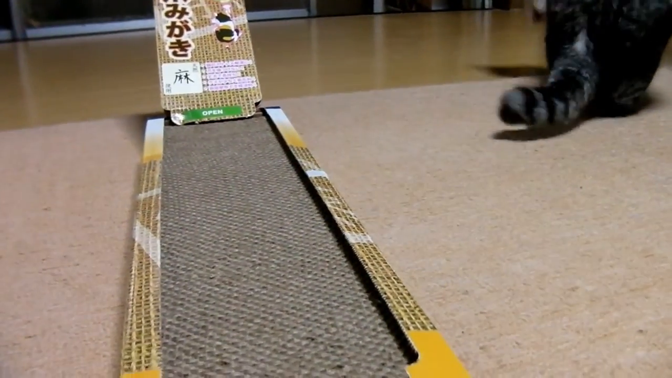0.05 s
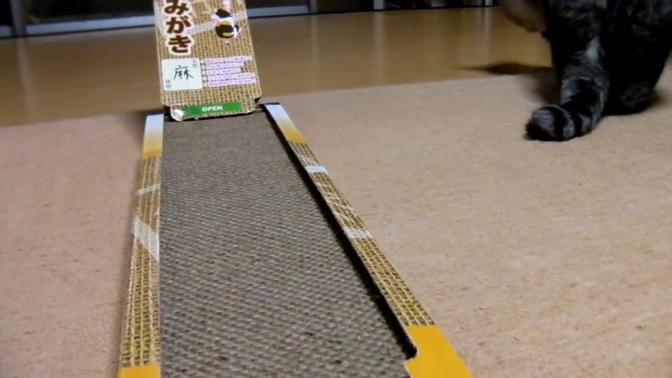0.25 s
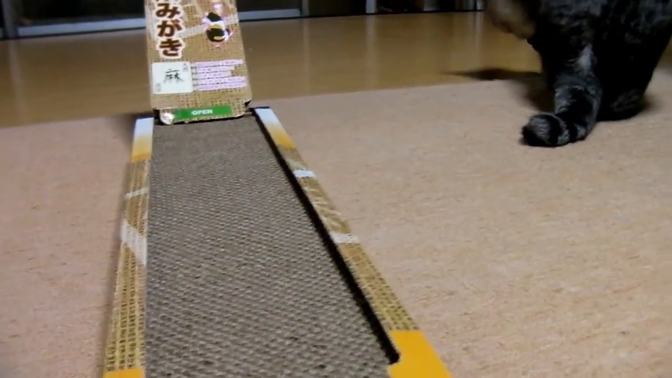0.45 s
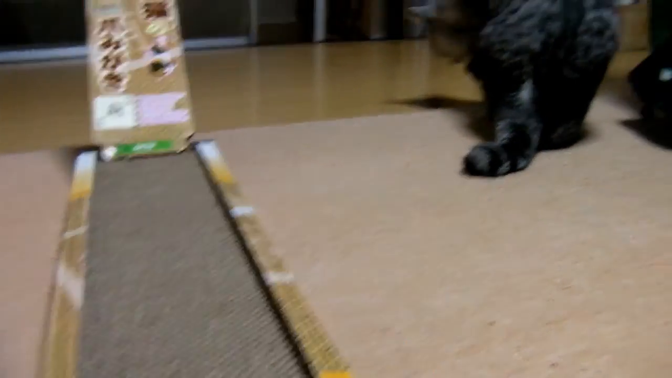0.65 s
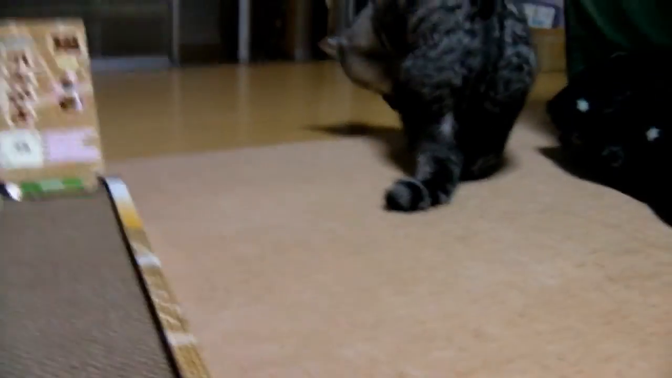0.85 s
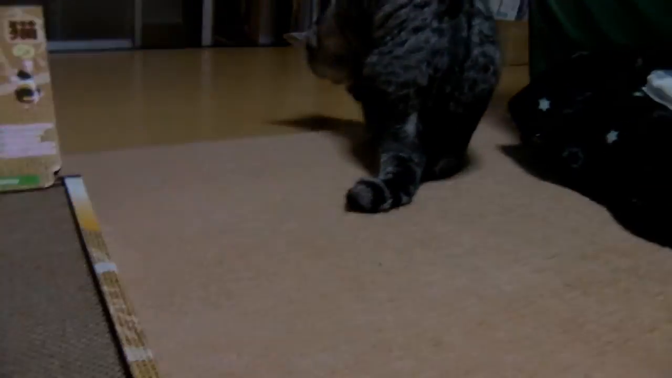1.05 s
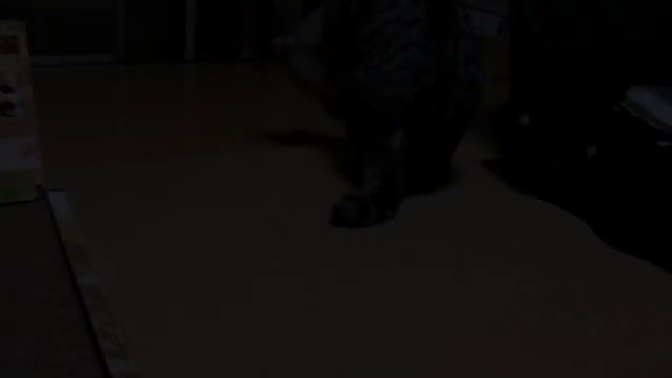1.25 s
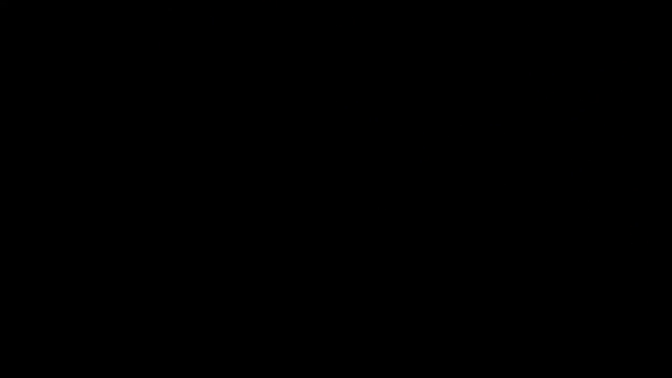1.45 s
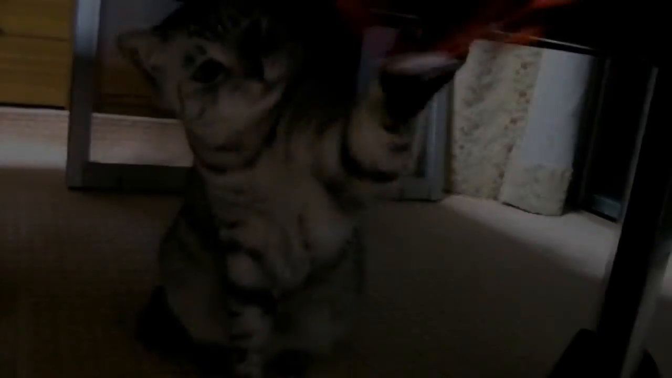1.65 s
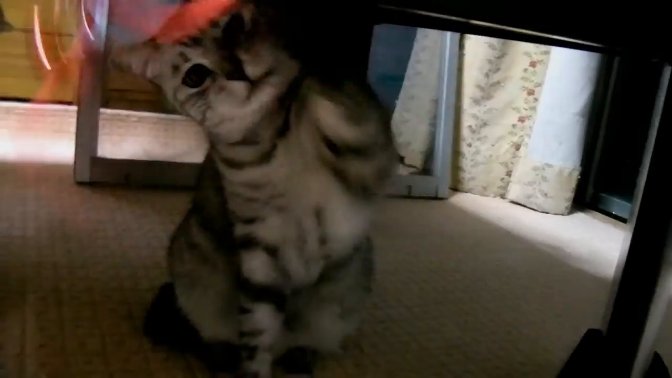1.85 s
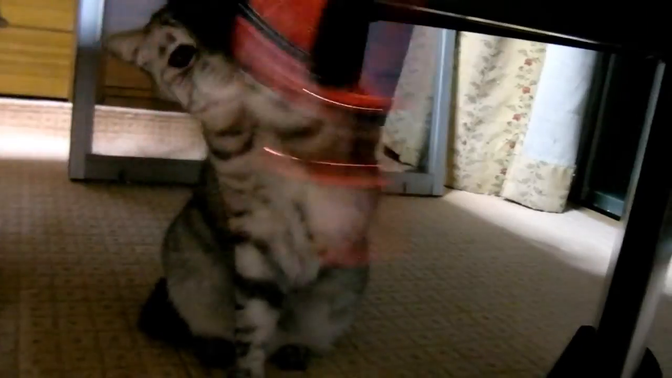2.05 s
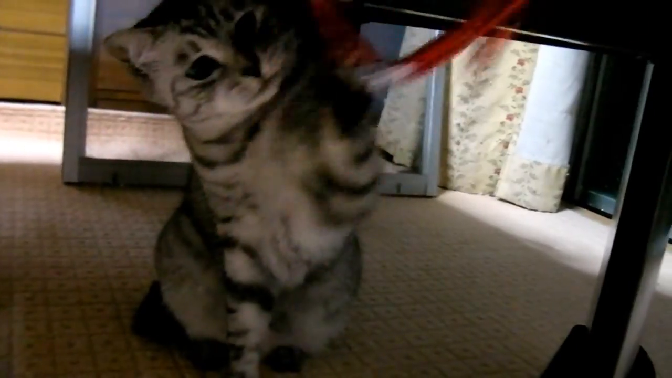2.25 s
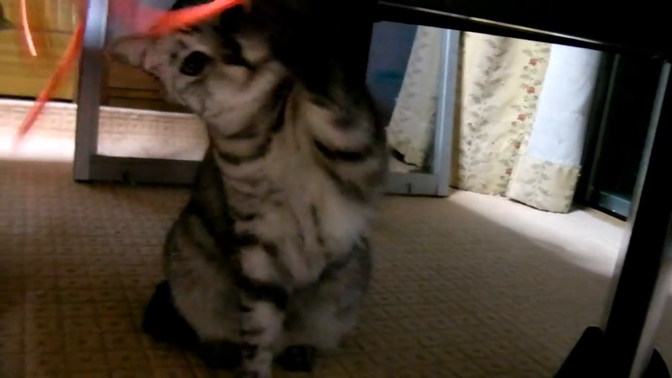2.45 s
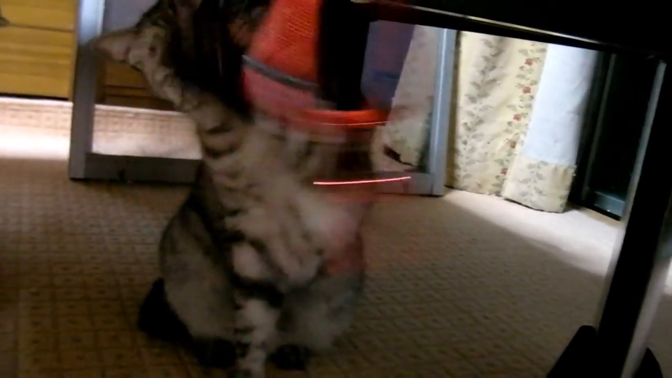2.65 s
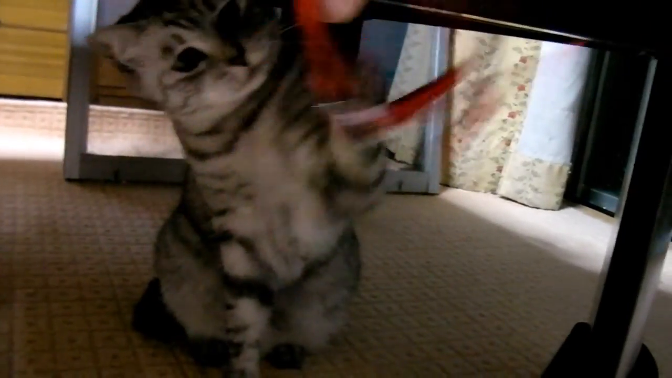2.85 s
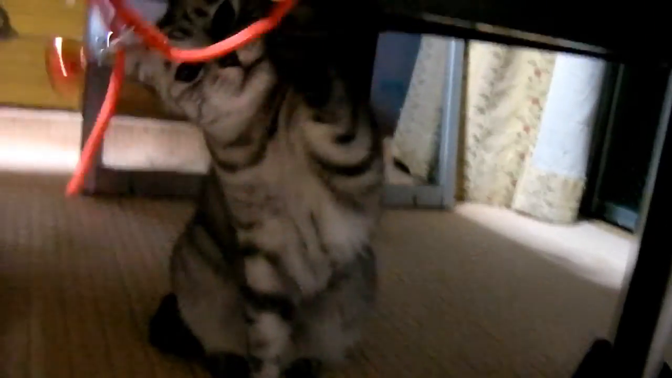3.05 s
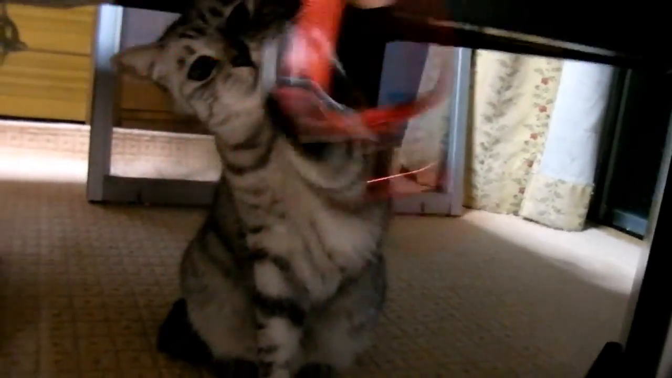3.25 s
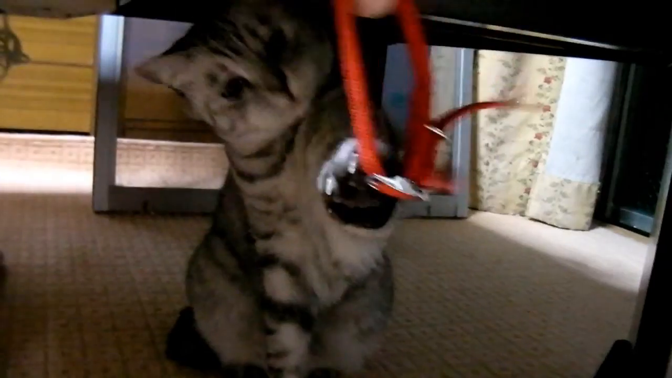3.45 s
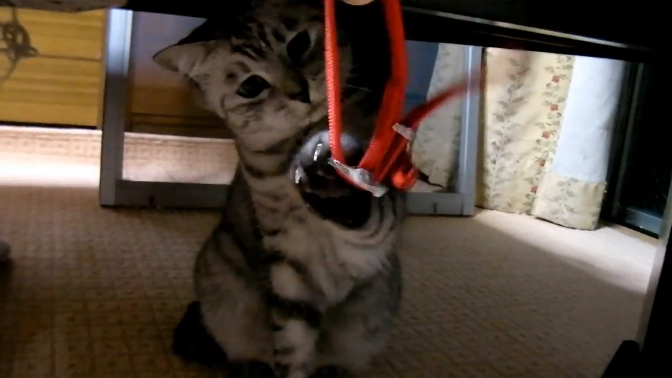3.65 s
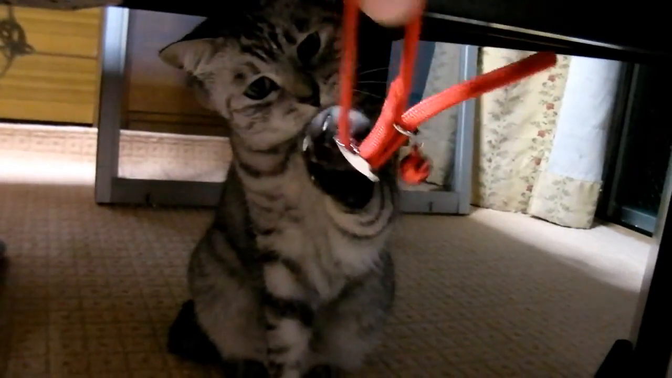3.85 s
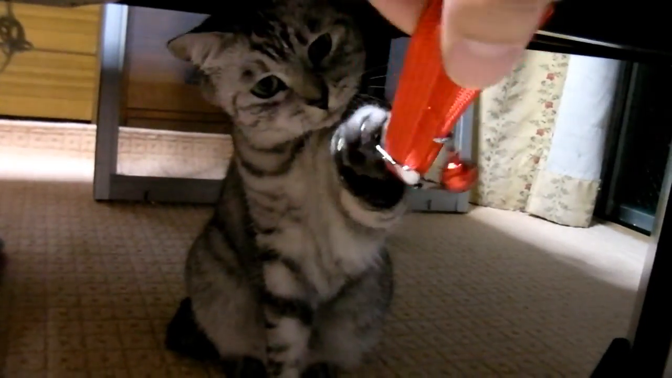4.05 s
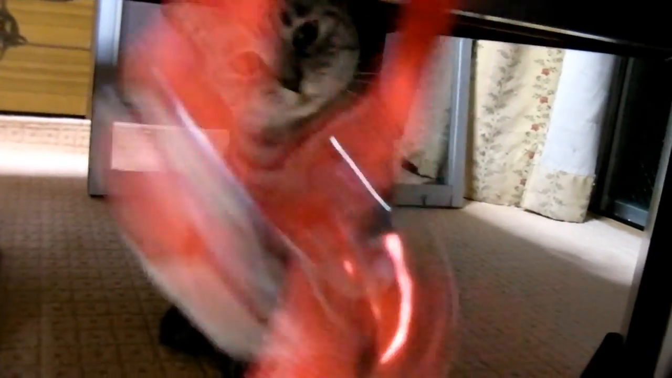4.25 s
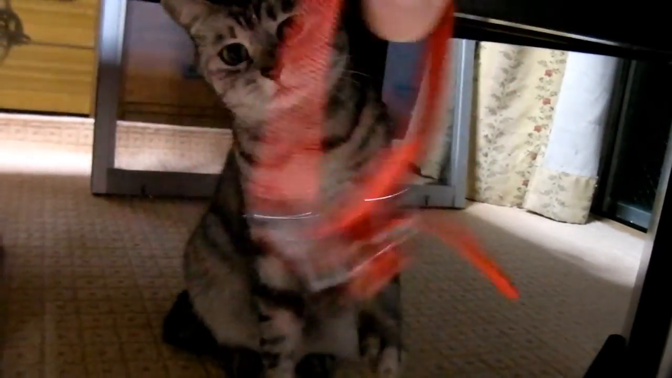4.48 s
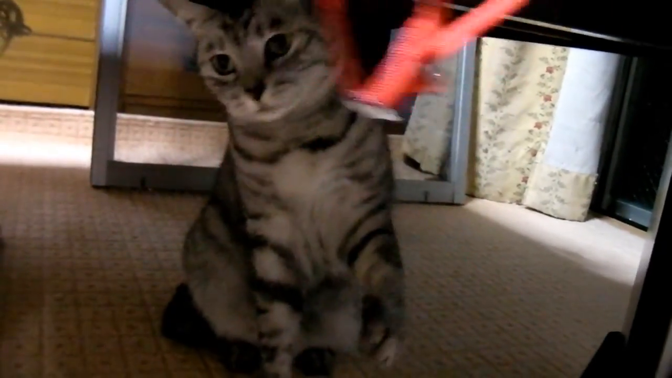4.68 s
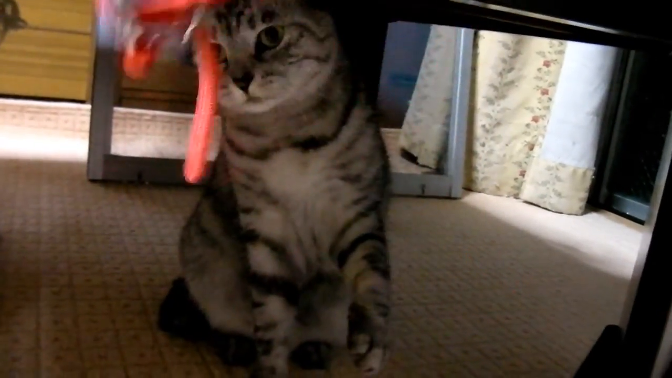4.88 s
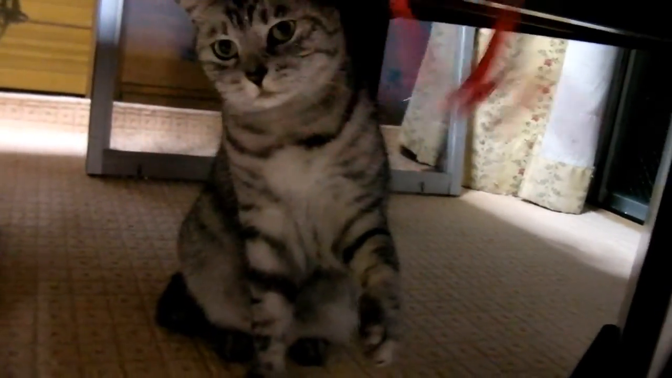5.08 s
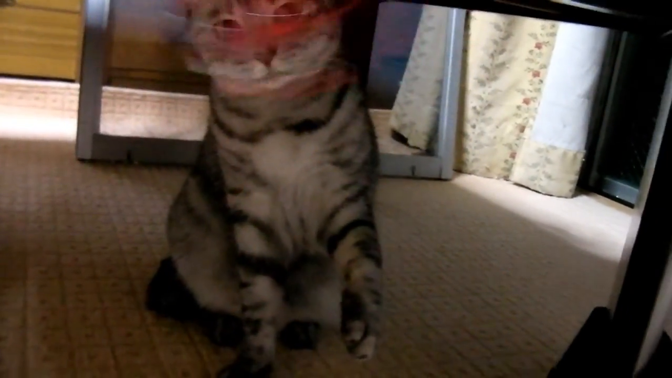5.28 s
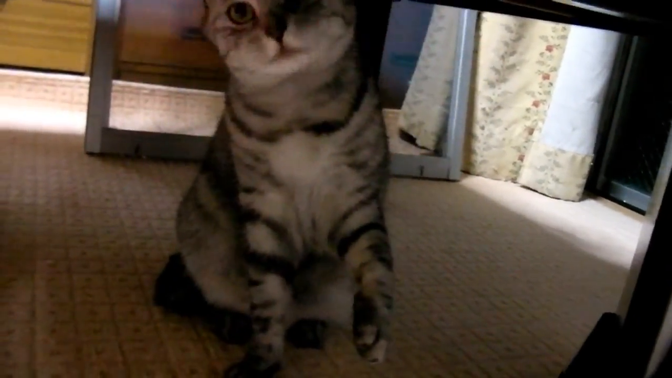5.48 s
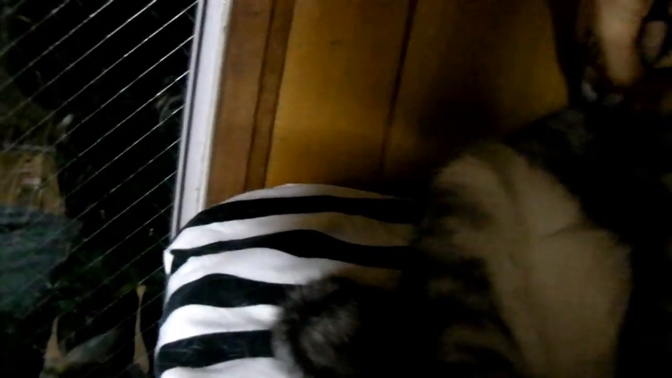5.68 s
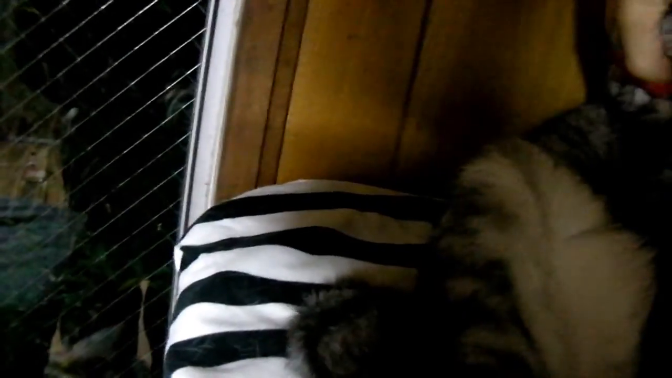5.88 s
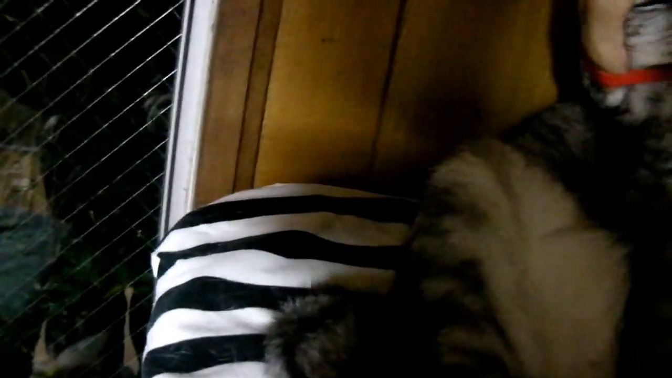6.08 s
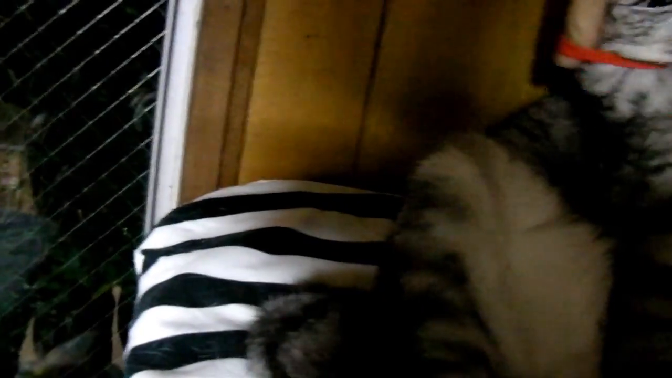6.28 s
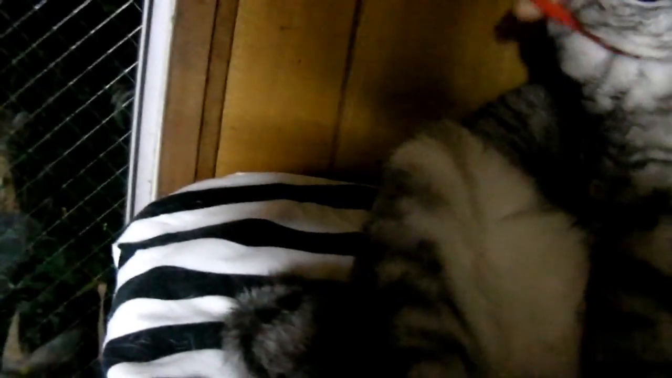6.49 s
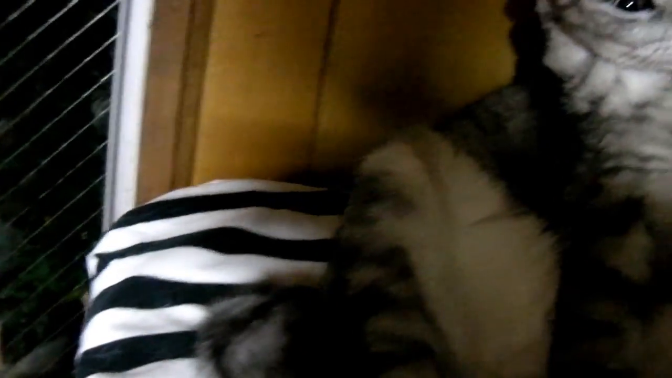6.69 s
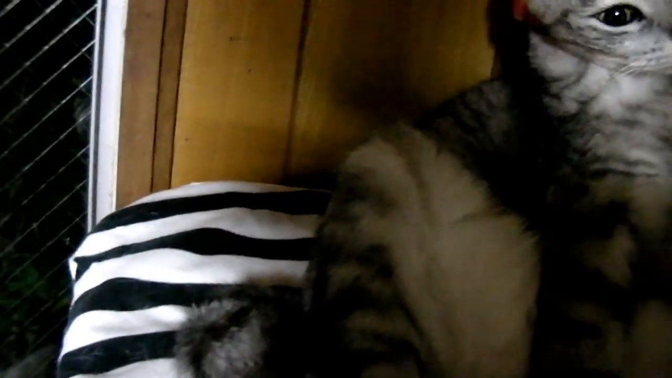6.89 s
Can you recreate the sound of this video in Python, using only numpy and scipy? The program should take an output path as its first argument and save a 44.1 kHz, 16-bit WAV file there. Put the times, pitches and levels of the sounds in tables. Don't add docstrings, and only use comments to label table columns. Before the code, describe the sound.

Hiss and lumpy handling rumble open with a few faint thumps. A small, high-pitched collar bell then jingles in quick separate shakes, with light tinkles between. The fullest burst comes when the strap is pulled free, snapping and clinking hard. One last bright jingle lands with a wooden tap, then rumble and soft bumps remain. Close handheld stereo microphone in a quiet room.

```python
import sys
import numpy as np
from scipy import signal
from scipy.fft import rfft, irfft, next_fast_len
from scipy.io import wavfile
from scipy.ndimage import uniform_filter1d

SR = 44100
rng = np.random.default_rng(int(sys.argv[2]) if len(sys.argv) > 2 else 0)


def to_wav(s):
    ch = np.atleast_2d(s).T
    pcm = np.round(np.clip(ch, -1, 1) * 32767)
    wavfile.write(sys.argv[1], SR, pcm.astype(np.int16))


def invert_db(level):
    return 10 ** (np.asarray(level, dtype=float) / 20)


N = 305454

# f/Hz, level/dB per Hz
RUMBLE_SPECTRUM = [(20, -24), (60, -5), (118, -2), (260, -5), (450, -11), (700, -48.5)]
HISS_SPECTRUM = [(150, -27.5), (400, 1), (2000, -2), (3900, -3.5), (4600, -7), (7000, -12.5), (8500, -13.5),
                 (15500, -18.5)]
# f/Hz, likeness/1
LIKENESS = [(50, 0.51), (150, 0.536), (1000, 0.1233), (4000, 0.033), (12000, 0.21)]
# t/s, level/dB
FLOOR_COURSE = [(0, -1), (.42, 0.5), (.69, 0.5), (1.0, 6), (1.41, 3.5), (2.1, -2), (3.26, -0.5), (4.1, -0.5),
                (4.6, -9), (5.1, -0.5), (5.62, -2), (5.68, 7.5), (5.94, 4.5), (6.4, -2.5), (6.73, 0), (6.93, 1.5)]
# from/s, to/s
DROPOUTS = [
    (4.9892, 4.9932),
    (5.0308, 5.036),
]
# t/s, peak/dB
THUMPS = [(0.152, -53), (0.516, -50.5), (4.315, -55.5), (4.412, -43.5), (5.768, -49), (5.914, -41),
          (6.289, -60.5), (6.531, -44.5), (6.658, -44.5), (6.88, -46.5)]
# t/s, peak/dB, body f/Hz, time for the body to fall 80 dB/s
KNOCKS = [(0.154, -52, 1550, 0.057), (1.078, -45.5, 975, 0.184), (1.371, -42.5, 1900, 0.066),
          (1.798, -18.5, 3790, 0.033), (2.1143, -21.5, 3750, 0.133), (2.135, -29.5, 2800, 0.054),
          (2.772, -33, 3940, 0.23), (2.8, -32.5, 2630, 0.08), (3.613, -30, 3550, 0.051),
          (4.278, -27, 2708, 0.018), (5.5989, -22.5, 2300, 0.042), (5.912, -35.5, 775, 0.1165),
          (6.643, -34.5, 768, 0.076), (6.728, -33.5, 514, 0.056), (6.863, -42, 782, 0.082)]
# t/s, peak/dB, body f/Hz, time for the body to fall 80 dB/s
MORE_KNOCKS = [(1.801, -39, 1000, 0.068), (2.1165, -39.5, 2300, 0.057), (2.139, -42, 1505, 0.105),
               (2.15, -45, 5230, 0.068), (2.7965, -34.5, 871, 0.118), (3.4415, -43.5, 6200, 0.5),
               (3.616, -48, 5570, 0.165), (4.284, -40, 5284, 0.3), (4.3215, -43.5, 5831, 0.173),
               (4.3627, -25.5, 5610, 0.1533), (4.4145, -30, 900, 0.064), (4.4165, -41, 2217, 0.089),
               (4.4305, -26, 5576, 0.1247), (5.604, -29.5, 1960, 0.149), (5.925, -42.5, 601.5, 0.273),
               (6.655, -43, 696, 0.154)]
# t/s, peak/dB
SNAPS = [(1.6422, -58.5), (2.781, -30), (3.443, -48), (3.4688, -34.5), (4.283, -36.5), (4.2974, -32.5),
         (4.3401, -32), (4.358, -27), (4.4149, -16.5), (5.6025, -27.5), (6.0049, -48.5), (6.0726, -41.5)]
# f/Hz, level/dB, t60/s
BOARD_MODES = [(880, 7, 0.0332), (1087, -2.5, 0.092), (3217, 8, 0.0114), (1661.5, -4, 0.118),
               (2133, 4, 0.018), (2698, 1.5, 0.07), (1900, 8, 0.0174), (3840, 5.5, 0.029),
               (1293, -1, 0.049)]
# t/s, left minus right/dB
SWING = [(1.5, 2), (2.2, 1.5), (2.9, 2), (3.55, -2.5), (4.2, -2), (4.43, -3.5), (4.65, -2.5), (5.0, 3),
         (5.7, 2)]
# t/s, main level/dB, t60/s, twin level/dB
SHAKE_BLOWS = [(1.624, -49.5, 0.41, -51), (1.6295, -39, 0.074, -37.5), (1.6423, -25, 0.45, -34.5),
               (1.6463, -48, 0.44, -49), (1.6617, -35, 0.033, -40.5), (1.6662, -33.5, 0.021, -42),
               (1.6712, -28.5, 0.42, -43.5), (1.6757, -22, 0.0161, -38.5), (1.6827, -40, 0.462, -49.5),
               (2.1127, -36.5, 0.462, -45), (2.1157, -23.5, 0.033, -39), (2.1441, -27, 0.042, -32.5),
               (2.1471, -24, 0.026, -25.5), (2.1531, -10, 0.0242, -24), (2.1565, -21, 0.04, -25),
               (2.1655, -23.5, 0.021, -28), (2.1691, -39.5, 0.56, -29), (2.195, -40.5, 0.462, -42.5),
               (2.205, -27, 0.462, -30.5), (2.208, -7.5, 0.36, -20.5), (2.2115, -15, 0.017, -18),
               (2.2145, -15.5, 0.025, -17), (2.2175, -15.5, 0.41, -23), (2.2215, -12, 0.031, -24.5),
               (2.2259, -39.5, 0.034, -31.5), (2.2359, -40, 0.46, -45), (2.2469, -30.5, 0.48, -41),
               (2.2499, -20.5, 0.445, -38), (2.2644, -18, 0.53, -37.5), (2.2683, -18, 0.023, -37),
               (2.7042, -37, 0.82, -36.5), (2.7059, -18.5, 0.116, -27), (2.7108, -16, 0.0133, -26),
               (2.7168, -30, 0.37, -38), (2.7288, -40, 0.49, -42), (2.782, -20, 0.38, -28.5),
               (2.7877, -11.5, 0.63, -16), (2.7941, -4.5, 0.0107, -19), (2.8001, -7.5, 0.049, -20),
               (2.8031, -23, 0.58, -25), (2.8101, -2, 0.0093, -14.5), (2.8131, -11.5, 0.55, -18.5),
               (2.8166, -30.5, 0.049, -20.5), (2.8201, -20.5, 0.58, -23), (2.8291, -34, 0.13, -38.5),
               (2.8485, -33.5, 0.12, -43.5), (2.8725, -43, 0.4, -48)]
PULLED_BLOWS = [(3.5452, -27.5, 0.033, -30.5), (3.5478, -23, 0.148, -36), (3.5609, -24, 0.058, -16.5),
                (3.5669, -15, 0.12, -42.5), (3.6068, -9, 0.098, -25.5), (3.6153, -8.5, 0.0168, -24),
                (3.6208, -16, 0.55, -28.5), (3.6238, -19.5, 0.55, -38), (3.6397, -21.5, 0.47, -30),
                (3.6437, -15.5, 0.062, -27.5), (3.6512, -12.5, 0.13, -30.5), (3.6622, -10.5, 0.077, -32.5),
                (3.6746, -36, 0.462, -38.5), (3.6806, -26, 0.48, -51), (3.6961, -31.0, 0.05, -40),
                (3.7066, -30.5, 0.063, -42.5), (3.7161, -28, 0.134, -37.5), (3.748, -37, 0.47, -37.5),
                (3.759, -16.5, 0.0328, -32), (3.7804, -49.5, 0.0474, -54), (4.3247, -30.5, 0.0298, -15),
                (4.3396, -33.5, 0.1366, -30.5), (4.3501, -49, 0.404, -45), (4.3576, -29.5, 0.45, -27),
                (4.3626, -14, 0.53, -13.5), (4.3676, -12.5, 0.048, -12.5), (4.3721, -10.5, 0.0198, -19.5),
                (4.3766, -11, 0.12, -22), (4.383, -32, 0.16, -31), (4.3895, -22.5, 0.0563, -31.5),
                (4.3985, -23.5, 0.462, -34.5), (4.406, -19.5, 0.494, -22.5), (4.411, -17.5, 0.49, -16.5),
                (4.4142, 9.5, 0.13, -22), (4.4297, -4.5, 0.01944, -13), (4.4364, -10.5, 0.424, -13.5),
                (4.4424, -17.5, 0.066, -29), (4.4454, -8.5, 0.426, -17.5), (4.4564, -6.5, 0.034, -20.5),
                (4.4644, -25, 0.1033, -35.5), (4.4753, -21, 0.45, -29.5), (4.4793, -17, 0.025, -27),
                (4.4878, -29, 0.058, -45.5)]
SWING_BLOWS = [(4.5093, -6.5, 0.4564, -19), (4.5132, -3, 0.17, -20.0), (4.5232, -6, 0.042, -26),
               (4.5292, -18, 0.15, -27), (4.5546, -34, 0.08, -30.5), (4.5771, -35.5, 0.462, -44),
               (4.5866, -30, 0.462, -33.5), (4.5926, -10, 0.084, -23), (4.6165, -11, 0.029, -18.5),
               (4.6265, -32, 0.462, -32), (4.6295, -10, 0.044, -19), (4.6474, -20, 0.62, -16.5),
               (4.6514, -9.5, 0.0235, -23.5), (4.6664, -32, 0.51, -34), (4.6739, -12, 0.015, -14),
               (4.6784, -20, 0.6, -36.5), (4.6958, -29, 0.074, -35), (4.7008, -16, 0.58, -28),
               (4.7043, -13, 0.045, -30.5), (4.7138, -17.5, 0.67, -27.5), (4.7168, -12.5, 0.037, -25),
               (4.7263, -20.5, 0.0678, -33), (4.7327, -13, 0.173, -30.5), (4.7417, -26, 0.041, -42.5),
               (4.7472, -38.5, 0.1655, -53), (4.7717, -36.5, 0.09, -57), (4.984, -40, 0.462, -39.5),
               (4.9857, -11, 0.41, -23.5), (4.9887, -38.5, 0.014, -37.5), (4.9937, -17.5, 0.462, -25),
               (4.9966, -32, 0.00932, -37), (5.0006, -57.5, 0.462, -59), (5.0241, -26, 0.462, -42.5),
               (5.0286, -11.5, 0.1113, -15), (5.0316, -41, 0.462, -34), (5.0366, -7.5, 0.0826, -22),
               (5.0475, -13.5, 0.074, -29), (5.0645, -17, 0.032, -31), (5.0755, -16, 0.0415, -32),
               (5.5617, 1.5, 0.047, -20), (5.566, -7, 0.169, -27), (5.5813, -23.5, 0.68, -23.5),
               (5.5933, -20, 0.63, -37.5), (5.5988, -12.5, 0.02588, -24), (5.6048, -20.5, 0.5, -29),
               (5.6107, -16.5, 0.0348, -24), (5.6212, -31, 0.45, -44), (5.6302, -25, 0.0207, -33),
               (5.6392, -39, 0.18, -41.5)]
# t/s, main level/dB, t60/s
LIGHT_TOUCHES = [(1.205, -48, 0.1), (1.5384, -36.5, 0.074), (1.811, -37.5, 0.12), (1.8182, -36, 0.039),
                 (1.88, -38, 0.0186), (1.943, -42.5, 0.0386), (2.2818, -38.5, 0.134), (2.369, -38.5, 0.055),
                 (2.4413, -34.5, 0.094), (2.4821, -39.5, 0.0127), (2.581, -38, 0.0143), (2.7517, -42, 0.63),
                 (3.003, -31.5, 0.0347), (3.451, -33.5, 0.0339), (3.522, -42, 0.13), (4.2857, -27, 0.0139),
                 (5.0869, -33, 0.092), (5.1262, -48.5, 0.241), (5.295, -36.5, 0.036), (5.491, -44.5, .15),
                 (5.782, -43, 0.027), (6.0163, -46.5, .2)]
# t/s, main and twin level/dB
GRAZES = [(1.92, -45.5), (2.4023, -44.5), (2.6064, -46), (3.3767, -48), (3.3952, -45.5), (3.487, -36.5),
          (3.5094, -43), (4.2996, -38.5), (4.3172, -29.5), (4.967, -38), (5.3289, -54), (5.3723, -45),
          (5.3926, -48), (5.478, -36), (5.506, -40.5)]
CAUGHT = [1.549, 1.691, 2.308, 2.4494, 2.888, 3.7945, 4.7877, 5.106, 5.168, 5.6594, 6.06]
# t/s, length/s, main level/dB, twin level/dB
ROLLS = [
    (1.576, 0.02562, -44.5, -60.5),
    (2.413, 0.00641, -38, -68),
    (2.9685, 0.00553, -34, -46.5),
    (3.4195, 0.006674, -44, -40.5),
    (3.4701, 0.0029, -31.5, -33.5),
    (5.464, 0.00254, -32.5, -50.5),
    (5.5205, 0.01035, -39.5, -44.5),
]
# from/s, to/s
FLIGHTS = [
    (2.155, 2.194),
    (3.5665, 3.604),
    (3.6804, 3.696),
    (4.4135, 4.429),
    (4.523, 4.577),
    (5.5615, 5.581),
]
# t/s, high mode level/dB, top mode level/dB, t60/s
CROWN_TOUCHES = [(1.6612, -51.5, -52.5, 0.13), (2.1508, -37.5, -30, 0.136), (2.209, -25, -25.5, 0.054),
                 (2.2493, -43.5, -45, 0.118), (2.7096, -42, -49.5, 0.287), (2.7873, -29, -50.5, 0.207),
                 (2.7986, -30.5, -25.5, 0.103), (2.8096, -27, -27, 0.055), (3.4222, -54.5, -57, 0.043),
                 (3.5654, -49, -45, 0.335), (3.6078, -35, -39, 0.18), (3.6146, -31, -35, 0.086),
                 (3.643, -31.5, -53.5, 0.176), (3.6626, -38, -45.5, 0.244), (3.7156, -60.5, -49, 0.31),
                 (4.3656, -49, -30.5, 0.181), (4.4082, -19.5, -45.5, 0.0935), (4.4308, -32, -24.5, 0.1006),
                 (4.447, -36.5, -40.5, 0.11), (4.5111, -41, -24, 0.36), (4.5267, -34.5, -24, 0.17),
                 (4.564, -46.5, -53, 0.278), (4.594, -27, -35.5, 0.077), (4.604, -46, -25.5, 0.088),
                 (4.6503, -45, -30.5, 0.106), (4.6734, -43, -29, .12), (4.701, -43, -35, 0.15),
                 (4.746, -61.5, -61.5, .1), (4.9856, -55, -37, 0.079), (5.0352, -44, -30, 0.164),
                 (5.049, -31.5, -40, 0.0914), (5.561, -34.5, -32.5, 0.226)]
# t/s, peak/dB
SLOT_STRIKES = [
    (4.985, -37),
    (4.994, -46.5),
    (5.028, -32),
    (5.036, -29),
    (5.562, -20.5),
]
# f/Hz, level/dB, t60/s
SLOT_MODES = [(8540, -10.5, 0.045), (13200, 0.5, 0.032)]
# t/s, peak/dB, f/Hz
LIP_HITS = [(1.7978, -40.5, 5750), (2.1145, -36.5, 5510), (2.1456, -33, 5200.0), (2.164, -32.5, 4980.0),
            (2.2071, -27.5, 5010), (2.213, -30, 4800), (2.2178, -33, 5070.0), (2.7073, -34, 5300),
            (2.7135, -38, 5050), (2.781, -29.5, 5340), (2.7927, -20, 5170), (2.8001, -20, 5160.0),
            (2.8088, -24, 5135), (2.8156, -23.5, 4988), (2.8246, -32.5, 5080.0), (3.4706, -35, 5080),
            (3.5454, -31.5, 5070.0), (3.5656, -22.5, 5100), (3.606, -25, 5110.0), (3.6137, -25, 5190),
            (3.6424, -32.0, 5126), (3.6499, -32.5, 5070), (3.6601, -33.5, 5200.0), (3.6706, -35.5, 5160.0),
            (3.7579, -41, 5180), (4.2834, -36, 5530), (4.326, -25, 5113), (4.3583, -28, 5070.0),
            (4.368, -10, 5325), (4.3815, -21.5, 5270), (4.3981, -28, 5300.0), (4.4085, -25, 5070.0),
            (4.4141, -7, 5943), (4.4249, -14.5, 5040), (4.4311, -16.5, 5420), (4.4373, -27.0, 5031),
            (4.4452, -19.5, 5120.0), (4.5084, -28, 5080), (4.5217, -26, 5078), (4.5914, -20, 5134),
            (4.6029, -11.5, 5123), (4.6325, -20, 5070.0), (4.65, -28.5, 5090.0), (4.6728, -23.5, 5130.0),
            (4.7007, -27.5, 4997), (4.9879, -31.5, 5150), (5.0306, -30.0, 5186), (5.0356, -25, 5110),
            (5.5613, -17.5, 5176), (5.5802, -24.5, 5050), (5.5873, -35, 5015), (5.5973, -31.5, 5440),
            (5.6059, -22, 5150), (5.6141, -35, 5035)]

MAIN_HZ, TWIN_HZ, HIGH_HZ, TOP_HZ = 4429, 4880, 10610, 11752
FREE_T60_S = 0.23


def rms_one(x):
    return x / np.sqrt(np.mean(x ** 2) + 1e-20)


def in_time(rows):
    t_s, value = np.transpose(rows)
    return np.interp(np.arange(N) / SR, t_s, value)


def at_hz(points, hz):
    point_hz, value = np.transpose(points)
    return np.interp(np.log(hz), np.log(point_hz), value)


def band(x, low_hz, high_hz):
    sos = signal.butter(2, [low_hz, min(high_hz, .45 * SR)], "band", fs=SR, output="sos")
    return signal.sosfilt(sos, x + 1e-18)


def drift(rate_hz):
    return rms_one(band(rng.standard_normal(N + SR), rate_hz / 4, rate_hz)[SR:])


def clicks_at(t_s, height):
    out = np.full(N, 1e-18)
    out[(np.asarray(t_s) * SR).astype(int)] = height
    return out


def burst(clicks, t60_s, channels=1):
    envelope = signal.lfilter([1], [1, -invert_db(-60 / (t60_s * SR))], clicks)
    return envelope * rng.standard_normal((channels, N))


def ring(clicks, hz, t60_s):
    r, w = invert_db(-60 / (t60_s * SR)), 2 * np.pi * hz / SR
    return signal.lfilter([0, np.sin(w)], [1, -2 * r * np.cos(w), r * r], clicks + 1e-18)


def coloured(spectrum):
    size = next_fast_len(N)
    hz = np.maximum(np.arange(size // 2 + 1) * SR / size, 1)
    mid, side = rfft(rng.standard_normal((2, size))) * invert_db(at_hz(spectrum, hz))
    alike = np.clip(at_hz(LIKENESS, hz), 0, 1)
    pair = np.sqrt(1 + alike) * mid + np.sqrt(1 - alike) * side * [[1], [-1]]
    return rms_one(irfft(pair, size)[:, :N])


def floor(loud):
    course_db = in_time(FLOOR_COURSE)
    fade_db = -5 * np.exp(-((np.arange(N) / SR - 1.515) / 0.42) ** 2)
    rumble_db = -60.5 + course_db + fade_db
    hiss_db = -55.5 + 0.2 * course_db + fade_db
    hiss = coloured(HISS_SPECTRUM)
    notch_hz, width_hz = 7843, 640
    hiss = hiss - signal.lfilter(*signal.iirpeak(notch_hz, notch_hz / width_hz, SR), hiss)
    level_db = 20 * np.log10(uniform_filter1d(np.abs(loud), SR // 50) + 1e-9)
    recovery_db = 150 * np.arange(N) / SR
    over_db = np.maximum.accumulate(np.maximum(level_db + 45, 0) + recovery_db) - recovery_db
    lumps_db = 1.4 * drift(4.55) + 3 * drift(25)
    rumble = invert_db(rumble_db + lumps_db + 2.0 - 0.22 * over_db) * coloured(RUMBLE_SPECTRUM)
    return rumble + invert_db(hiss_db + 5 + 0.89 * drift(22.0) + 0.12 * lumps_db - 0.11 * over_db) * hiss


def room(x, t60_s):
    t = np.arange(SR // 3) / SR
    echoes = rng.standard_normal((2, len(t))) * invert_db(-60 * t / t60_s) * (t > .004)
    return signal.fftconvolve(x[None], echoes / np.sqrt(np.sum(echoes[0] ** 2)), axes=1)[:, :N]


def thumps():
    t_s, peak_db = np.transpose(THUMPS)
    return band(burst(clicks_at(t_s, invert_db(peak_db + 17.5)), t60_s=0.1)[0], 58.867, 420)


def board_tap():
    tap_s, tap_db = 5.598, -16.0
    tap = clicks_at([tap_s, tap_s + .0095], invert_db([tap_db, tap_db - 12.5]))
    modes = 0
    for k, (hz, db, t60_s) in enumerate(BOARD_MODES):
        modes = modes + (-1) ** k * invert_db(db - 15.0) * ring(tap, hz, t60_s)
    return band(modes, 783, 9000)


def snaps():
    t_s, peak_db = np.transpose(SNAPS)
    return band(burst(clicks_at(t_s, invert_db(peak_db + 2)), t60_s=0.01, channels=2), 4000, 14660)


def dull_bodies():
    out, t = np.zeros(N), np.arange(SR // 5) / SR
    for t_s, peak_db, hz, t60_s in list(KNOCKS) + list(MORE_KNOCKS):
        noise = rng.standard_normal(len(t))
        body = rms_one(band(band(noise, hz / 1.35, hz * 1.26), hz / 2, hz * 2)) * invert_db(-80 * t / t60_s)
        crack = rms_one(band(noise[::-1], hz / 3, 12500)) * invert_db(-13.0 - 60 * t / 0.026)
        at = round(t_s * SR)
        out[at:at + len(t)] += (invert_db(peak_db - 6.0) * (body + crack))[:N - at]
    return out


def knocks():
    return dull_bodies() + snaps() + thumps() + board_tap()


def lip_pings():
    out, t = np.zeros(N), np.arange(SR // 20) / SR
    for t_s, peak_db, hz in LIP_HITS:
        envelope = invert_db(peak_db + 2 - 60 * t / 0.0083) * (1 - np.exp(-t / 0.00017))
        at = round(t_s * SR)
        out[at:at + len(t)] += envelope * np.sin(2 * np.pi * hz * t)
    return out


def slot_modes():
    t_s, peak_db = np.transpose(SLOT_STRIKES)
    strikes = clicks_at(t_s, invert_db(peak_db))
    return sum(invert_db(db) * ring(strikes, hz, t60_s) for hz, db, t60_s in SLOT_MODES)


def roll_touches(starts):
    rows = []
    for t_s, length_s, main_db, twin_db in ROLLS:
        end = min(t_s + length_s, starts[starts > t_s][0])
        held = np.clip(-main_db / 12, 0, 1)
        skips = np.r_[t_s, t_s + 0.0048 * np.cumsum(rng.uniform(1.0, 1.5, 6))]
        for at, lift, twin_lift in zip(skips, *rng.standard_normal((2, 7))):
            lift_db = 3 * lift if at > t_s else 8
            if at < end:
                rows.append((at, main_db + held * lift_db, .5, twin_db + 3.5 * twin_lift))
        if end == t_s + length_s:
            rows.append((end, main_db - 3.5, .022, twin_db - 3.5))
    return rows


def touches():
    rows = list(SHAKE_BLOWS) + list(PULLED_BLOWS) + list(SWING_BLOWS)
    rows += [(t_s, db, t60_s, db - 12) for t_s, db, t60_s in LIGHT_TOUCHES]
    rows += [(t_s, -60, .03, -64) for t_s in CAUGHT]
    rows += [(t_s, db, 0.019, db) for t_s, db in GRAZES]
    starts = np.sort([row[0] for row in rows + list(ROLLS)])
    rows += roll_touches(starts)
    return np.array(sorted(rows, key=lambda row: row[0])).T


def latest(t_s):
    return np.maximum(np.searchsorted(t_s, np.arange(N) / SR) - 1, 0)


def touched_mode(t_s, level_db, t60_s, contact_s, pressed=True):
    before_db = np.r_[-120, level_db[:-1] - 60 * np.diff(t_s) / t60_s[:-1]]
    jump = invert_db(level_db) - invert_db(before_db)
    turns = rng.uniform(-np.pi, np.pi, len(t_s)) * np.clip(jump / invert_db(level_db), 0, 1)
    phase = np.cumsum(turns)
    raised_hz = np.minimum(3.7 / t60_s, 140) * rng.random(len(t_s)) * (jump > 0) * pressed
    last = latest(t_s)
    since = np.arange(N) / SR - t_s[last]
    height = (since >= 0) * invert_db(level_db[last] - 60 * np.abs(since) / t60_s[last])
    height = height * np.exp(1j * (phase[last] + 2 * np.pi * raised_hz[last] * since))
    keep = np.exp(-1 / (contact_s * SR))
    return signal.lfilter([1 - keep], [1, -keep], height + 1e-18), jump


def crown_modes(shell, rolling, wobble):
    t_s, high_db, top_db, t60_s = np.transpose(CROWN_TOUCHES)
    t, sides = np.arange(N) / SR, np.array([[1], [-1]])
    out, bright = 0, 0
    for hz, level_db in ((HIGH_HZ, high_db), (TOP_HZ, top_db)):
        high, jump = touched_mode(t_s, level_db, t60_s, contact_s=0.00016)
        held = np.minimum(1, invert_db(-9.5) * shell / np.abs(high))
        facing = invert_db(.8 * drift(12) * sides) * np.exp(1j * (0.48 + .3 * drift(7.29)) * sides)
        flicker = invert_db(3.5 * np.sqrt(rolling) * drift(70.64))
        wave = np.real(facing * high * wobble * np.exp(2j * np.pi * hz * t))
        out = out + held * flicker * wave
        bright = bright + np.maximum(jump, 0)
    puffs = burst(clicks_at(t_s, bright), t60_s=0.0084, channels=2)
    return out + invert_db(-3.0) * band(puffs, 6000, 15890)


def contact_ticks(t_s, main_jump, twin_jump, thrown):
    height = np.maximum(main_jump + twin_jump, -.3 * main_jump)
    touch = burst(clicks_at(t_s, height), t60_s=0.012)
    air = ring(clicks_at(t_s, thrown * np.maximum(main_jump, 0)), 4591.4, 0.012255)
    return invert_db(-14.0) * band(band(touch, 3200, 5900), 4100, 7300) + invert_db(-8.0) * air


def roll_rattle(shell, rolling):
    grit = shell * rolling * rng.standard_normal(N) * invert_db(1.86 * drift(230))
    rattle = invert_db(-26.0) * band(grit, 4303, 5830) + invert_db(-30) * band(grit, 8700, 16300)
    rebounds = (rng.random(N) < 210 / SR) * invert_db(-7.5 + 2.5 * rng.standard_normal(N))
    chatter = rebounds * uniform_filter1d(shell * rolling, size=300)
    return rattle + band(band(burst(chatter, t60_s=0.0119), 3500, 5420), 4400, 7230)


def bell():
    t = np.arange(N) / SR
    t_s, main_db, t60_s, twin_db = touches()
    flying = np.any([(t > a) & (t < b) for a, b in FLIGHTS], axis=0)
    free = flying[(t_s * SR).astype(int)]
    main, main_jump = touched_mode(t_s, main_db, t60_s, .0003, ~free)
    twin, twin_jump = touched_mode(t_s, twin_db, np.where(free, .6, t60_s), .0003, ~free)
    shell = np.abs(main) + np.abs(twin)
    thrown = np.clip(-main_db / 12, .03, 1)
    faint = np.clip((-main_db - 20) / 9, 0, 1.5)
    fed = np.maximum(faint, thrown * np.clip(t60_s / FREE_T60_S - 1, .25, 1))
    rolling = fed[latest(t_s)] * np.where(flying, .05, 1)
    wobble = 1 + .28 * rolling * (drift(250) + 1j * drift(210))
    main = main * wobble
    twin = twin * np.conj(wobble) * invert_db(-3 * ((shell > .06) & ~flying))
    out = np.real(main * np.exp(2j * np.pi * MAIN_HZ * t) + twin * np.exp(2j * np.pi * TWIN_HZ * t))
    out = out + crown_modes(shell, rolling, wobble) + slot_modes() + lip_pings()
    out = out + contact_ticks(t_s, main_jump, twin_jump, thrown) + roll_rattle(shell, rolling)
    small = signal.butter(6, 4080, "high", fs=SR, output="sos")
    return np.roll(signal.sosfilt(small, out), -SR // 2000, axis=-1)


def scene():
    shaken, knocked, pan_db = bell(), knocks(), in_time(SWING)
    near = (shaken + knocked) * invert_db(np.array([pan_db, -pan_db]) / 2)
    far = invert_db(-30) * room(shaken[0], t60_s=.15) + invert_db(-9.5) * room(knocked[0], t60_s=0.41)
    return near + far + floor(shaken[0])


def top_cut(x):
    return signal.sosfilt(signal.butter(12, 15640, fs=SR, output="sos"), x)


def record(dry):
    t = np.arange(N) / SR
    on = np.prod([(t < a) | (t > b) for a, b in DROPOUTS], axis=0)
    hot = np.clip(dry * np.maximum(uniform_filter1d(on * 1., size=40), .03), -.95, .95)
    recorder = signal.resample_poly(hot, 160, 147, axis=1)
    at = np.arange(N) * 48000 / SR
    rough = np.array([np.interp(at, np.arange(len(c)), c) for c in recorder])
    low_pass = signal.butter(12, 17600, fs=SR, output="sos")
    return top_cut(signal.sosfilt(low_pass, rough))


dry = scene()
out = record(dry)
to_wav(out)
```